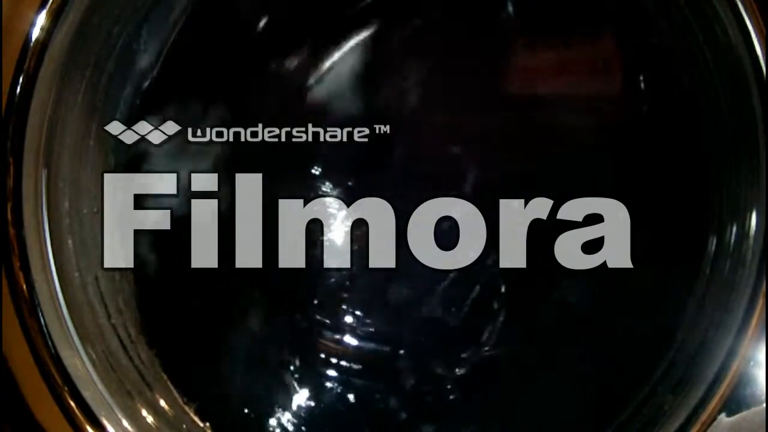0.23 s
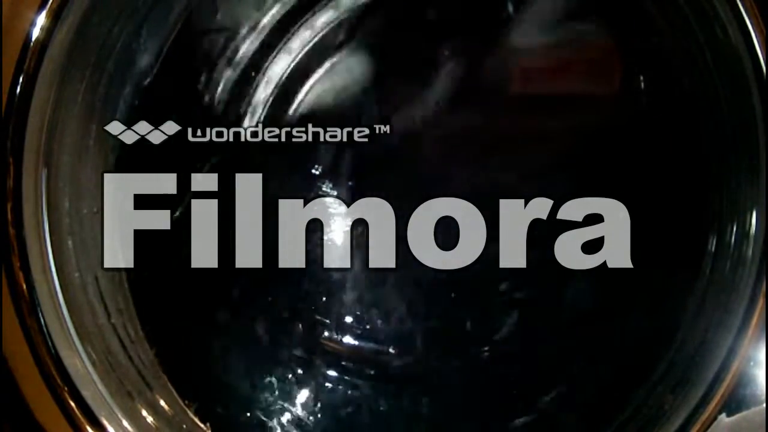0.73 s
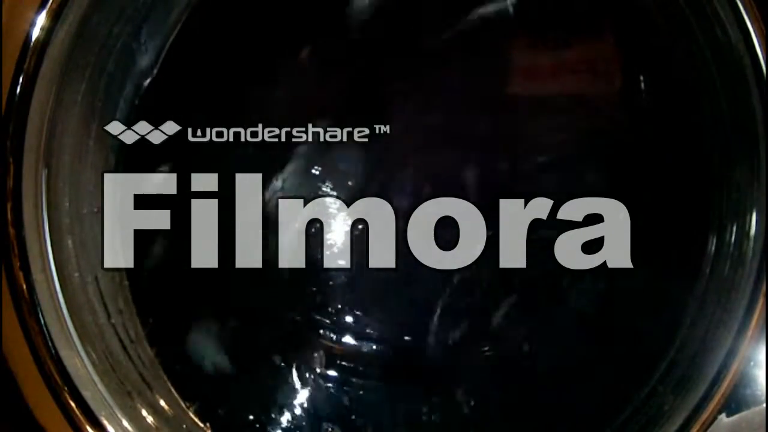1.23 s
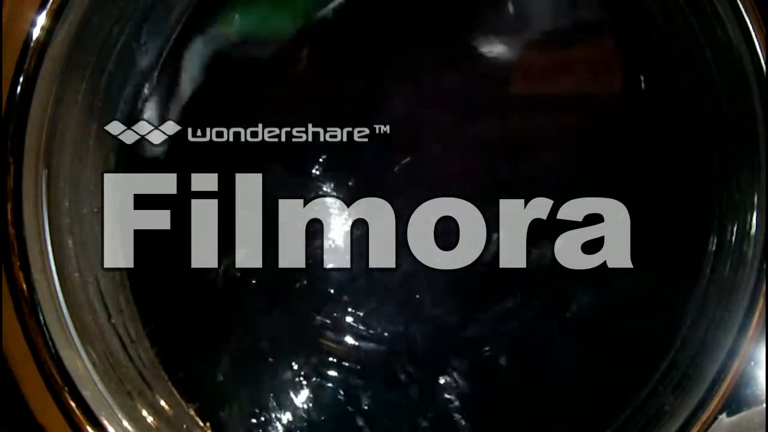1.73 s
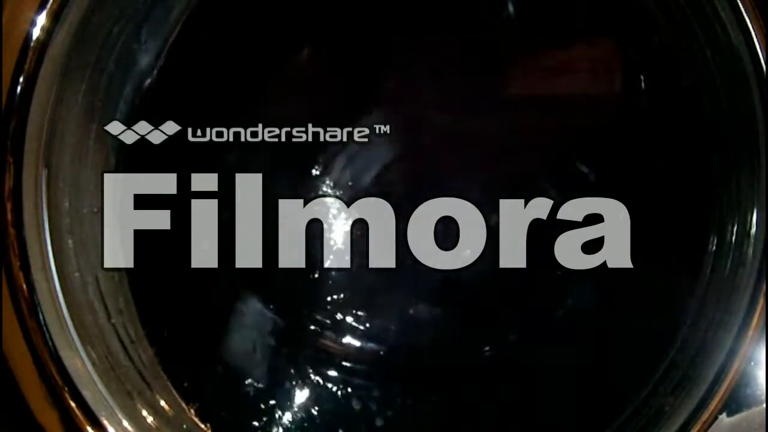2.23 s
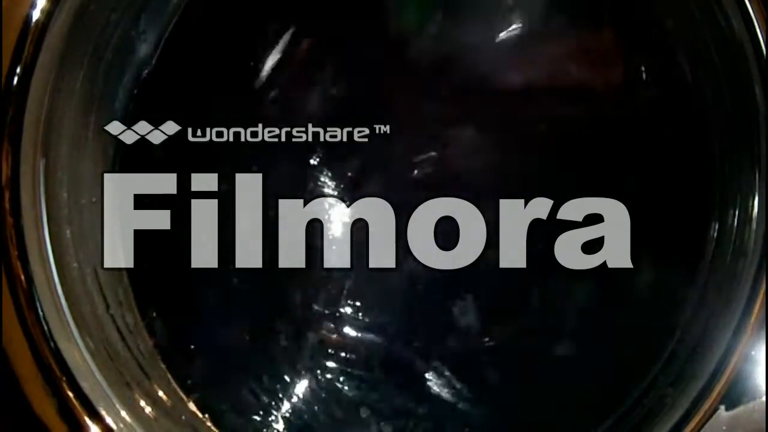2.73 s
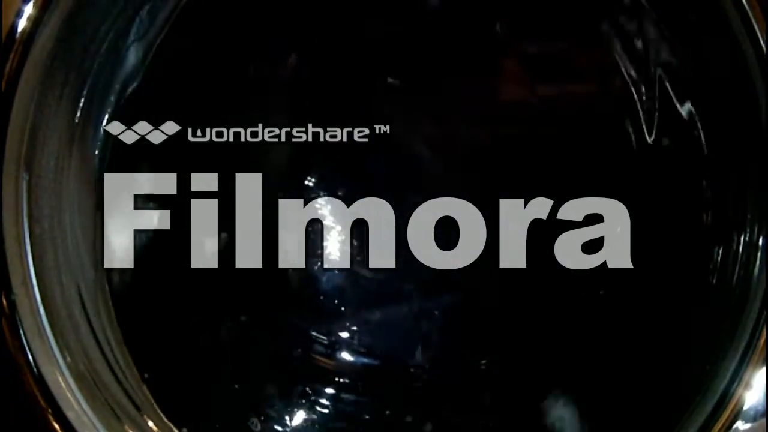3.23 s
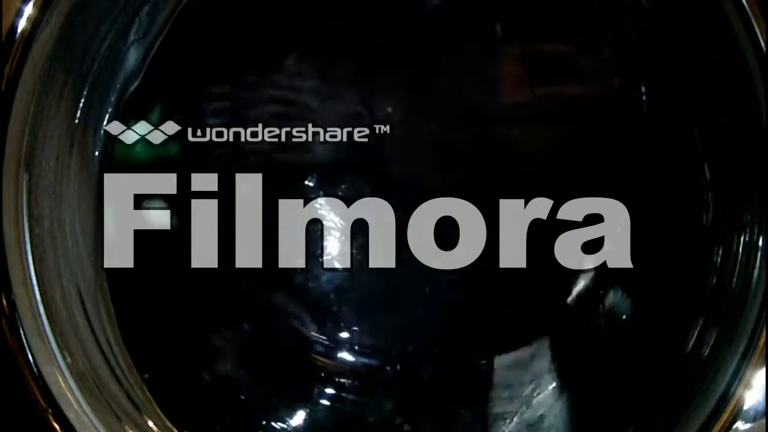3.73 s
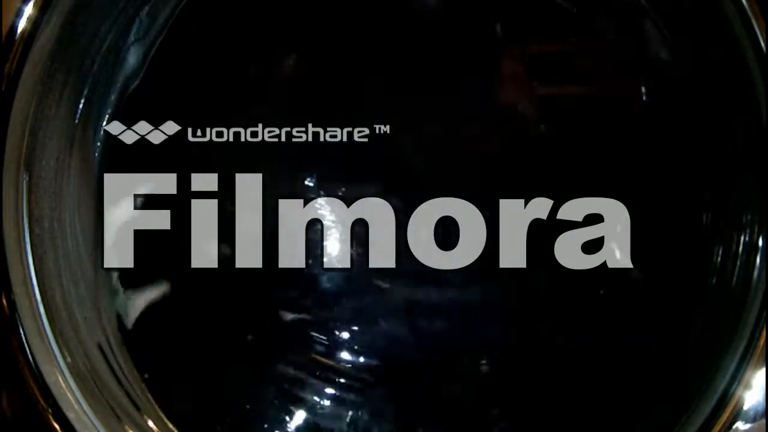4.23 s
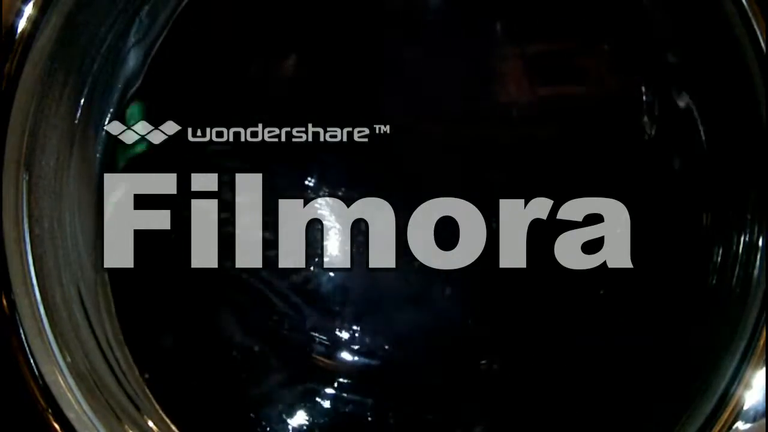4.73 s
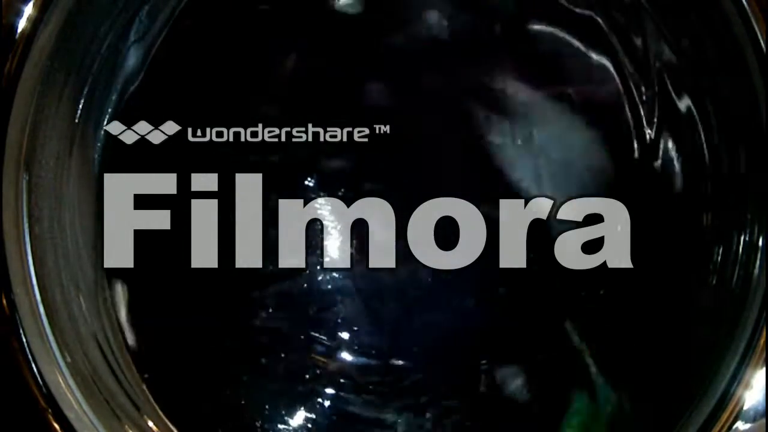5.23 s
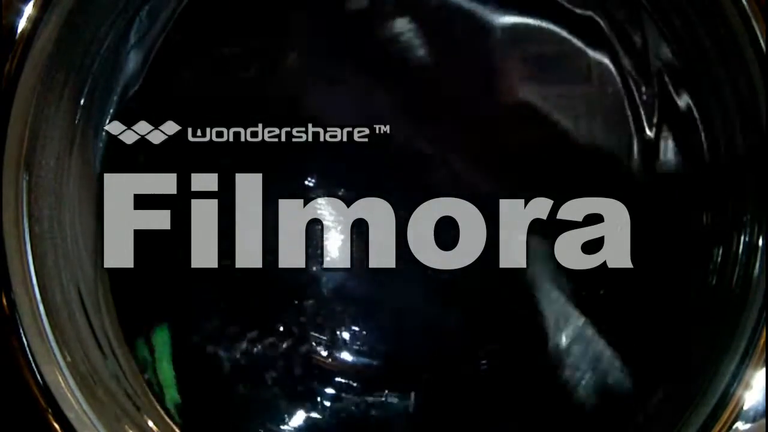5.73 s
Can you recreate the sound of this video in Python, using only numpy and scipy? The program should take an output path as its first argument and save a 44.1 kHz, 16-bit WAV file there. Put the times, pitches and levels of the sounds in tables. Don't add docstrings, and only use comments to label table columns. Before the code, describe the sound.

Close handheld laundry-room sound: low pulsing motor drone, tumbling wet cloth, tiny button ticks, then fingers bumping the phone, one hard snap, and more tumbling.

```python
import sys
import numpy as np
from scipy import signal
from scipy.fft import rfft, irfft
from scipy.io import wavfile
from scipy.ndimage import uniform_filter1d

SR = 44100
rng = np.random.default_rng(int(sys.argv[2]) if len(sys.argv) > 2 else 0)


def gain_from_decibels(decibels):
    exponent = np.asarray(decibels, float) / 20
    return 10 ** exponent


def master(y):
    cut = np.clip(np.atleast_2d(y).T, -1, 1)
    pcm = np.round(cut * 32767)
    wavfile.write(sys.argv[1], SR, pcm.astype(np.int16))


N = 264600
SHIFT_S = 2.8
TURN_S, LOAD_FALLS_S = 0.99, 0.66


def trace(table):
    s, *columns = np.transpose(table)
    return [np.interp(np.arange(N) / SR, s, column) for column in columns]


def unit(x):
    return x / np.sqrt(np.mean(x ** 2))


def band(x, lo_hz, hi_hz):
    return signal.sosfilt(signal.butter(2, [lo_hz, hi_hz], "band", fs=SR, output="sos"), x)


def walk(rate):
    hold = int(SR / rate)
    steps = np.repeat(rng.standard_normal(N // hold + 1), hold)
    return unit(uniform_filter1d(uniform_filter1d(steps, hold), hold)[:N])


def lifts_db(hz, peaks):
    return sum(db / (1 + (2 * (hz - f) / width) ** 2) for f, width, db in peaks)


def add(out, s, x):
    i = int(s * SR)
    out[i:i + len(x)] += x[:N - i]


def ring(hz, t60):
    t = np.arange(int(.2 * SR)) / SR
    return np.sin(2 * np.pi * hz * t) * np.exp(-np.log(1000) * t / t60)


def burst(lo_hz, hi_hz, t60, slope=1., rise_s=.0004):
    n = int(.12 * SR)
    t = np.arange(n) / SR
    hz = np.arange(n // 2 + 1) * SR / n + 1
    edges = np.sqrt((1 + (lo_hz / hz) ** 8) * (1 + (hz / hi_hz) ** 14))
    noise = irfft(rfft(rng.standard_normal(n)) * hz ** -slope / edges, n)
    puff = noise * np.minimum(t / rise_s, 1) * 1000 ** (-t / t60)
    return puff / np.abs(puff).max()


def drum_turn(lag_s):
    return ((np.arange(N) / SR - LOAD_FALLS_S - lag_s) / TURN_S + .5) % 1 - .5


# (frequency [Hz], density [dB per Hz])
RUSH = [(20, -0.5), (40, -0.5), (75, 2), (140, -2.5), (300, -14.5), (420, -19.5), (900, -24), (1400, -29.5),
        (1600, -35), (3300, -37.5), (4000, -46.5), (6500, -53), (10000, -54), (15500, -61.5)]
# (frequency [Hz], width [Hz], lift [dB])
PANELS = [(137.8, 17.8, 5), (166.9, 4.88, 7), (253.2, 61, 8), (360, 81, 9), (640, 68, 8), (1200, 304.7, 12),
          (1914, 650, 4), (3000, 91, 5.5), (3300, 550, -1.5), (5560, 1900, 4)]
# (frequency [Hz], width [Hz], lift [dB])
SPOT_BEFORE = [(72, 7.5, -2.5), (203, 9, 2), (265.6, 14, 4.5), (283, 30, -3), (388, 22, 2), (412, 13, -2.5),
               (466, 17, -2.5), (644, 49, 1)]
SPOT_AFTER = [(72, 17, -2.5), (134, 21, -2), (202.6, 19, -2), (294.5, 34, -2.5), (378, 30, 1.5),
              (486, 46, -4), (624, 36, -3), (686, 26, 3)]


def rush():
    hz = np.arange(1, N // 2 + 2) * SR / N
    f, db = np.transpose(RUSH)
    colour = gain_from_decibels(np.interp(np.log(hz), np.log(f), db) + lifts_db(hz, PANELS))
    lands_db = 0.5 * np.cos(2 * np.pi * drum_turn(lag_s=0.36))
    low_db = lands_db + 1.03 * walk(7.3)
    upper_db = lands_db + 0.34 * walk(9)
    out = np.zeros(N)
    for centre in 31 * 2. ** np.arange(10):
        share = np.cos(np.pi / 2 * np.clip(np.log2(hz / centre), -1, 1))
        octave = irfft(rfft(rng.standard_normal(N)) * colour * share, N)
        sway_db = low_db * (100 < centre < 400) + upper_db * (400 < centre < 1500)
        slow_db = 1.013 if centre < 1500 else 0.45
        out += octave * gain_from_decibels(sway_db + slow_db * walk(5.998) + 1.09 * walk(30))
    before = irfft(rfft(out) * gain_from_decibels(lifts_db(hz, SPOT_BEFORE)), N)
    after = irfft(rfft(out) * gain_from_decibels(lifts_db(hz, SPOT_AFTER)), N)
    return gain_from_decibels(-37) * unit(np.where(np.arange(N) / SR < SHIFT_S, before, after))


def hum(hz, db, flutter_db, rough, start_s=0.):
    t = np.arange(N) / SR - start_s
    shake = 1 + rough * (walk(24) + 1j * walk(24))
    level = np.sqrt(2) * gain_from_decibels(db + flutter_db * walk(12))
    return level * np.real(shake * np.exp(2j * np.pi * hz * t))


# (time [s], washer drive level [dB], dryer motor level [dB])
STANCE = [(0, -39, -50), (1.2, -42.5, -41), (2.4, -40.5, -42), (2.75, -34.5, -48.5), (3.2, -33, -73),
          (3.6, -36, -50.5), (4.0, -46.5, -35.5), (4.4, -35, -65), (5.3, -37, -40), (5.7, -46, -55),
          (6.0, -36, -40)]


def drives():
    drive_hz, beat_hz, in_step_s = 46.2, 2.9, 1.028
    washer_db, dryer_db = trace(STANCE)
    washer = hum(drive_hz, washer_db, 0.46, 0.26, in_step_s)
    dryer = hum(drive_hz - beat_hz, dryer_db, 0.5, 0.33, in_step_s)
    return washer + dryer


# (time [s], level [dB])
EFFORT = [(0, -35.5), (0.37, -35), (0.66, -47), (0.92, -35), (1.6, -43), (2.15, -32.5), (2.62, -40.5),
          (3.08, -33.5), (3.6, -44), (3.82, -33.5), (4.1, -39.5), (4.35, -36), (4.62, -39.5), (4.9, -34),
          (5.18, -42.5), (5.35, -33.5), (5.62, -43.5), (5.95, -35)]


def mains():
    return hum(100.9, trace(EFFORT)[0] - 1, 0.57, 0.36)


# (frequency [Hz], level before the shift [dB], level after [dB])
MOTOR_TONES = [(139.38, -49, -52.5), (176.04, -61.5, -48), (260.3, -60.5, -51.5), (344, -53.5, -66),
               (678.5, -60.5, -63), (268.5, -55, -72), (495, -66, -86), (527, -79.5, -66.5),
               (607, -78, -60.5), (699, -80, -61.5)]


def motors():
    t = np.arange(N) / SR
    out = drives() + mains() + hum(36.8, -55, 1.9, 0.45)
    for hz, before_db, after_db in MOTOR_TONES:
        db = np.where(t < SHIFT_S, before_db, after_db) + 2.7 * walk(3.054)
        out += gain_from_decibels(db) * np.sin(2 * np.pi * hz * (t + 0.00163 * walk(2)))
    return out


# (time [s], peak [dB], wall ring [Hz], high edge [Hz], t60 [s])
SLAPS = [(0.303, -35, 920, 1500, 0.079), (0.730, -33, 1230, 1380, 0.044), (0.917, -35.5, 685, 1500, 0.15),
         (0.926, -44, 2210, 2900, 0.09), (1.268, -33, 903, 2800, 0.094), (1.873, -35, 654, 1400, 0.066),
         (2.036, -40, 1182, 1400, 0.049), (2.045, -32.5, 1231, 1340, 0.093), (2.047, -33, 574, 1300, 0.225),
         (4.127, -33.5, 1180, 1410, 0.037), (5.979, -31, 680, 1400, 0.1), (1.283, -44, 1950, 2300, .09),
         (1.418, -36.5, 1154, 1450, 0.077), (1.452, -39, 1190, 1400, .05), (1.97, -40, 1200, 1400, .05),
         (2.068, -34.5, 910, 1350, 0.093), (2.145, -36, 640, 1300, .06), (2.18, -39, 686, 800, .12),
         (4.41, -41, 650, 800, 0.17), (4.605, -34.5, 700, 800, 0.09), (4.65, -35, 710, 1300, 0.081),
         (5.903, -46, 2030, 2300, 0.12), (5.915, -52, 2950, 3200, .08)]


def slaps():
    out = np.zeros(N)
    for s, db, wall_hz, hi_hz, t60 in SLAPS:
        add(out, s, gain_from_decibels(db - 3.5) * burst(0.81 * wall_hz, hi_hz, t60, slope=0.77, rise_s=0.002))
        add(out, s, gain_from_decibels(db - 4.5) * ring(wall_hz, 0.71 * t60))
    return out


# (time [s], peak [dB], low edge [Hz], high edge [Hz], t60 [s])
TICKS = [(0.205, -57, 4000, 12100, 0.045), (0.41, -48.5, 1800, 3480, 0.069),
         (0.662, -56.5, 8500, 11500, .03), (1.109, -63, 9020, 11900, 0.035), (1.517, -57, 2750, 3000, 0.08),
         (1.52, -56, 3400, 3900, .05), (0.92, -50, 1500, 3200, .08), (5.903, -53, 2200, 3300, .07),
         (1.80, -60.5, 2500, 11940, 0.051), (2.048, -49, 2013, 4000, 0.04), (2.19, -64, 8030, 12070, 0.034),
         (2.404, -43, 992, 9020, 0.019), (3.731, -49.5, 2612, 3360, 0.065), (3.82, -54, 4500, 10000, 0.09),
         (4.37, -55.5, 3000, 5495, 0.041), (4.619, -51, 2000, 4800, 0.044), (4.705, -52, 2006, 4500, 0.078),
         (4.824, -42.5, 3040, 3580, 0.11), (4.822, -53, 2500, 5500, .05), (5.66, -64, 9780, 11000, 0.055),
         (1.268, -45, 1400, 3600, 0.08), (5.947, -46.5, 1000, 3200, 0.051),
         (5.988, -50.5, 4000, 11900, 0.036)]


def buttons():
    out = np.zeros(N)
    for s, db, lo_hz, hi_hz, t60 in TICKS:
        add(out, s, gain_from_decibels(db) * burst(lo_hz, hi_hz, t60))
    return out


# (frequency [Hz], level [dB], t60 [s])
TAG_EDGE = [(1160, -6.5, 0.067), (1872, -6, 0.083), (2887, -10, .07), (4710, -21, .04), (4830, -8.5, .05),
            (6270, -32, .06), (6590, -28, .08), (7553, -38, .07), (9119, -19, .035), (10480, -11.5, .06),
            (10700, -13, .03), (12320, -36, .07)]
TAG_FACE = [(1160, 9.5, 0.058), (1880, 2.5, 0.052), (2880, 1, .09), (3500, -10, 0.065), (4820, 3.5, 0.053),
            (5700, -7, .03), (6270, -14, 0.065), (7036, -20, .08), (9170, -13, .03), (10730, -11, .03),
            (11340, -20, .05), (12510, -25, .06)]
TAG_TIP = [(1141, 2.5, 0.12), (1893, 0.5, 0.042), (2869, 1.5, .1), (3580, -14, .07), (4350, -6, .03),
           (4660, -7.5, 0.1), (5800, -15, .05), (6320, -16, .08), (7050, -16, .06), (8550, -14, .05),
           (9814, -6, 0.07), (10500, -11, 0.065), (11300, -19, .05), (12600, -16, .065)]
# (time [s], peak [dB], crack beside the ring [dB])
CLINKS = [
    (0.5866, -24.5, -9),
    (2.8875, -25, -10),
    (3.5658, -22.5, -6),
    (3.581, -30.5, -1.5),
    (3.62, -48, -7.5),
    (3.637, -51, -13.5),
]


def tag_ring(modes):
    beats_hz = 45 * rng.uniform(0.24, 1.7, len(modes))
    tone = 0
    for (hz, db, t60), beat_hz in zip(modes, beats_hz):
        mode = ring(hz, min(1.07 * t60, .13))
        if hz > 2500:
            mode = mode + .4 * ring(hz + beat_hz, 0.77 * min(t60, .1))
        tone = tone + gain_from_decibels(db) * mode
    return tone / np.abs(tone).max()


def tag():
    out = np.zeros(N)
    for (s, db, crack_db), modes in zip(CLINKS, (TAG_EDGE, TAG_FACE, *[TAG_TIP] * 4)):
        add(out, s, gain_from_decibels(db) * tag_ring(modes))
        add(out, s, gain_from_decibels(db + crack_db) * burst(1700, 14000, 0.021, slope=0.19))
        add(out, s, gain_from_decibels(db + crack_db - 17) * burst(2700, 14000, 0.1, slope=0.3))
    walls = burst(920, 15800, 0.15, slope=0.25)
    return out + gain_from_decibels(-19) * signal.fftconvolve(out, walls / np.linalg.norm(walls))[:N]


# (time [s], level [dB], treble [dB])
SCRAPE = [
    [(2.56, -74, -13), (2.578, -61, -22), (2.585, -65, -14), (2.61, -67, -19.5), (2.635, -62.5, -22)],
    [(2.978, -45, -29.5), (2.995, -54, -11), (3.006, -45.5, -12), (3.0265, -46, -12.5), (3.028, -39.5, -10),
     (3.044, -40, -14.5), (3.049, -34.5, -14), (3.0565, -32.5, -16), (3.0585, -47, -14.5)],
    [(3.0585, -46, -12.5), (3.07, -57, -13), (3.085, -48.5, -13), (3.096, -51, -14), (3.101, -66, -10)],
]
# (frequency [Hz], width [Hz], lift [dB])
SKIN = [(2310, 99, 9), (3000, 270, 7.5), (4000, 480, 3), (6160, 1200, 6), (10000, 1500, 4.5)]


def scrape():
    t = np.arange(N) / SR
    grains = rng.standard_normal(N) * gain_from_decibels(1.5 * walk(400) + .6 * walk(120))
    grains = irfft(rfft(grains) * gain_from_decibels(lifts_db(np.arange(N // 2 + 1) * SR / N, SKIN)), N)
    body = unit(band(grains, 710, 4700))
    treble = unit(band(band(grains, 3800, 13200), 2700, 12760))
    catch_db = 2.5 * walk(170)
    out = np.zeros(N)
    for slide in SCRAPE:
        db, top_db = trace(slide)
        touch = (t > slide[0][0]) & (t < slide[-1][0])
        out += touch * gain_from_decibels(db + catch_db) * (body + gain_from_decibels(top_db) * treble)
    return out


# (time [s], peak [dB], ring [Hz], t60 [s])
CASE_RINGS = [(2.511, -35, 1208, .015), (2.537, -32, 1225, 0.0124), (2.5585, -23, 800, 0.022),
              (2.559, -26.5, 1317, 0.018), (2.581, -31, 1180, 0.017), (2.584, -40, 2740, 0.023),
              (2.733, -44, 3300, 0.0108), (2.513, -44, 3300, 0.011), (2.515, -46, 2295, 0.0113),
              (2.604, -20, 910, 0.0164), (2.609, -22.5, 815, 0.0166), (2.609, -27.5, 1320, 0.037),
              (2.659, -32, 700, .012), (2.681, -26, 1310, 0.0127), (2.752, -42, 900, 0.01),
              (2.977, -32, 2380, 0.023), (3.005, -44, 2900, 0.051), (3.007, -46, 5700, 0.029),
              (3.049, -37.5, 2300, .04), (3.053, -32.5, 3830, 0.025), (3.0962, -17, 400, 0.015),
              (3.0933, -26, 1260, 0.015), (3.0935, -30, 2350, .012), (3.027, -37, 2100, .015),
              (3.035, -40, 3400, .012), (3.042, -38, 4300, .012), (2.98, -30, 1300, 0.022),
              (3.057, -22.5, 1250, 0.017), (3.077, -40, 3220, .012), (3.093, -24.5, 1227, 0.025)]


def case_rings():
    out = np.zeros(N)
    for s, db, hz, t60 in CASE_RINGS:
        add(out, s, gain_from_decibels(db) * ring(hz, t60))
    return out


# (time [s], peak [dB], case ring [Hz], snap 1.2-5.5 kHz [dB], snap 3.9-12.5 kHz [dB])
KNOCKS = [(2.51, -30, 380, -38.5, -39.5), (2.535, -26, 370, -55, -70), (2.558, -18.5, 415, -31, -52),
          (2.596, -20, 380, -42, -59), (2.6035, -18, 398, -41.5, -53), (2.610, -18.5, 378, -45, -53),
          (2.617, -17.5, 364, -60, -80.5), (2.6595, -15.5, 393, -34, -41), (2.681, -22, 419, -29.5, -23),
          (2.723, -14.5, 416, -50, -70), (2.733, -16.5, 472, -51, -72), (2.752, -14.5, 404, -51, -64),
          (2.955, -28, 280, -50, -46), (2.967, -42.5, 279, -48, -41), (2.978, -16, 412, -37, -54.5),
          (2.997, -21.5, 298, -40, -45.5), (3.055, -19, 386, -40, -35), (3.065, -16, 325, -35.5, -50.5),
          (3.077, -21, 354, -32.5, -38), (3.0925, -11, 399, -36.5, -43), (3.009, -31, 400, -60, -70),
          (3.033, -32, 520, -60, -70), (3.041, -24.5, 523, -60, -70), (2.564, -24, 412, -60, -70)]
PRE_SNAP = (2.7072, -17, 330, -52, -58)


def knocks():
    out = np.zeros(N)
    push = np.hanning(int(0.00099 * SR))
    for s, db, hz, mid_db, top_db in [*KNOCKS, PRE_SNAP]:
        case = ring(hz, 0.028) + gain_from_decibels(-9.5) * ring(2.1 * hz, 0.019)
        case += gain_from_decibels(-8.5) * (ring(3.2 * hz, 0.018) + ring(1.358 * hz, 0.019))
        add(out, s, -gain_from_decibels(db + 0.5) * band(np.convolve(case, push / push.sum()), 298, 3900))
        add(out, s + 0.00062, gain_from_decibels(mid_db + 7.0) * burst(1200, 5500, 0.016, slope=1.9))
        add(out, s + .001, gain_from_decibels(top_db - 5.5) * burst(3900, 12500, 0.0054, slope=0.55))
    return out


# (frequency [Hz], level [dB], t60 [s])
SNAP = [(410, -6, .018), (600, -6, .008), (1230, -4, .011), (2350, -16, .006), (3000, -14, .0035),
        (3800, -12, .004), (4450, -31, .014), (5730, -20, .004), (8600, -17, .004), (10100, -17, .0035),
        (11200, -16, .0025), (14600, -29, .003)]


def case_snap():
    snap_s, peak_db = 2.713, -.6
    out = np.zeros(N)
    snap = sum(gain_from_decibels(db) * ring(hz, t60) for hz, db, t60 in SNAP)
    add(out, snap_s, gain_from_decibels(peak_db) * snap / snap.max())
    add(out, snap_s, gain_from_decibels(peak_db - 25) * burst(1500, 15500, 0.007, slope=0.6))
    return out


def scene():
    machines = rush() + motors()
    load = slaps() + buttons() + tag()
    hand = scrape() + case_rings() + knocks() + case_snap()
    return (machines + load + hand)[None]


def roll_off(x):
    return signal.sosfilt(signal.butter(12, 16520, fs=SR, output="sos"), x)


# (frequency [Hz], width [Hz], lift [dB])
MIC_NOTCH = (8200, 700, -7)
MIC_LIFT = (9000, 720, 3.8)
# (start [s], end [s])
DROPOUT_S = (2.7727, 2.8725)


def record(dry):
    hz = np.arange(N // 2 + 1) * SR / N
    t = np.arange(N) / SR
    lost_s, back_s = DROPOUT_S
    top_cut_db = 30 * np.clip((hz - 15750) / 500 + .5, 0, 1)
    mix = irfft(rfft(dry) * gain_from_decibels(lifts_db(hz, [MIC_NOTCH, MIC_LIFT]) - top_cut_db), N)
    mix = mix + gain_from_decibels(-87) * np.sin(2 * np.pi * 7867 * t)
    heard = np.clip((lost_s - t) / .00025, 0, 1) + (t > back_s)
    mix = mix * heard * np.minimum(t / .006, 1)
    jump = .012 * (t > back_s) * np.exp(-np.maximum(t - back_s, 0) / .002)
    mix = mix + jump
    return roll_off(mix)


dry = scene()
out = record(dry)
master(out)
```